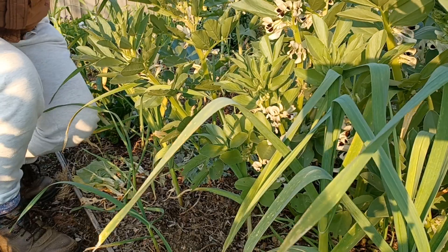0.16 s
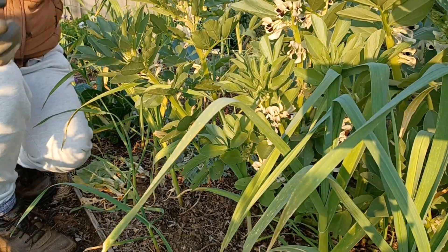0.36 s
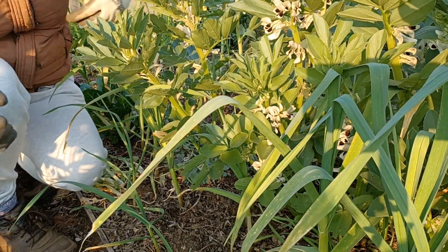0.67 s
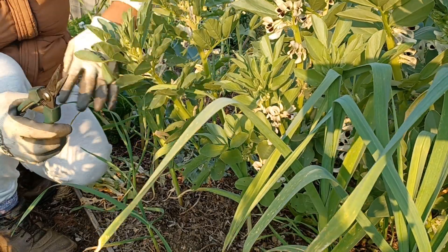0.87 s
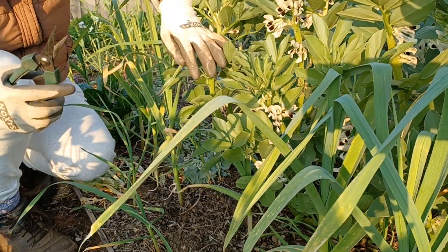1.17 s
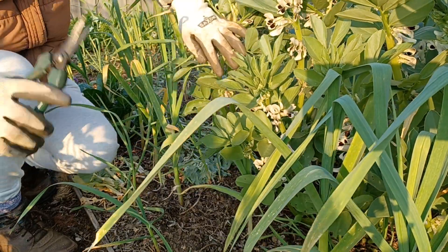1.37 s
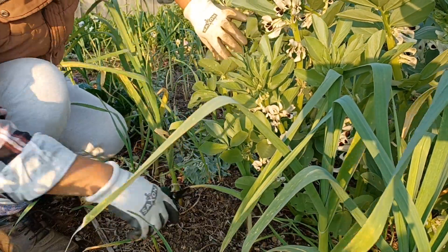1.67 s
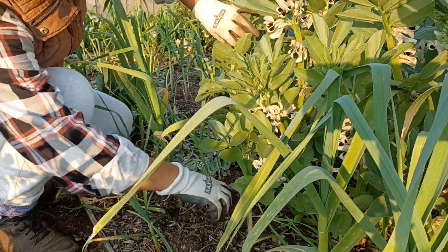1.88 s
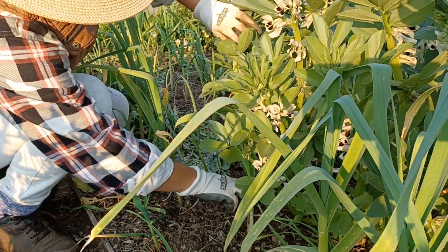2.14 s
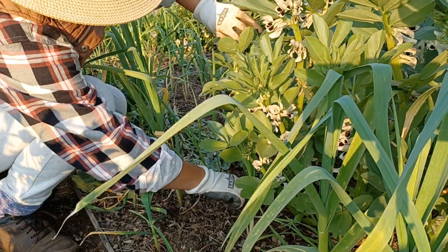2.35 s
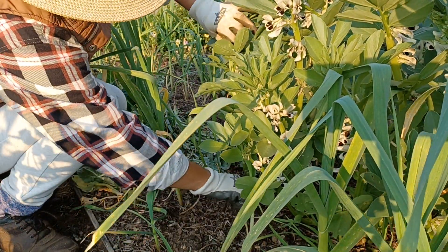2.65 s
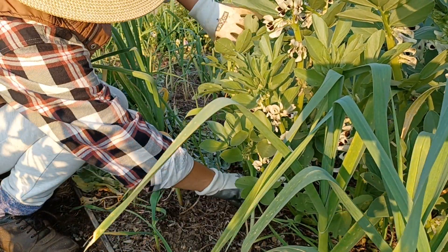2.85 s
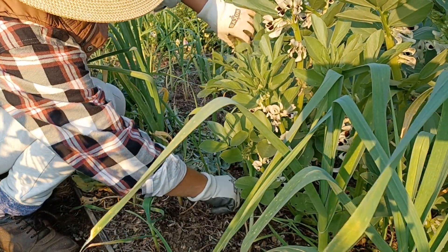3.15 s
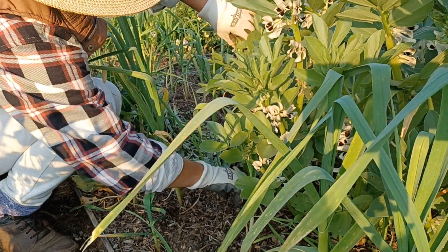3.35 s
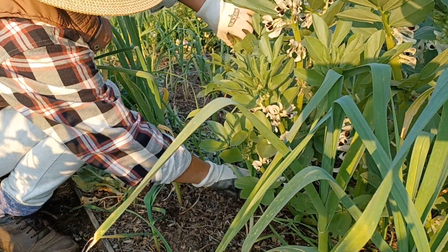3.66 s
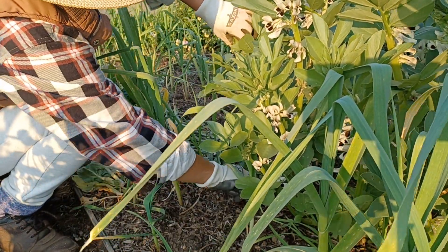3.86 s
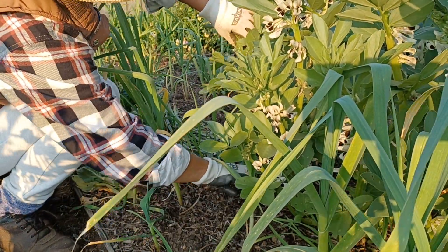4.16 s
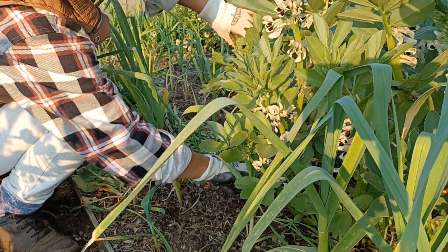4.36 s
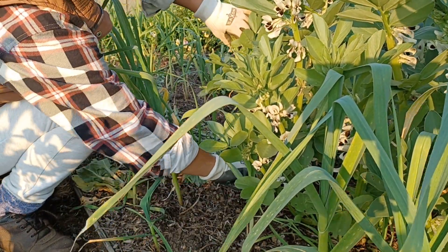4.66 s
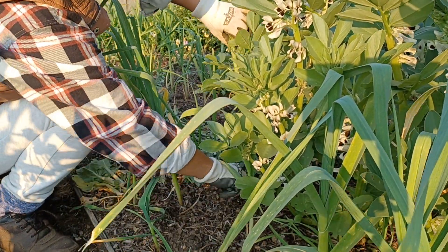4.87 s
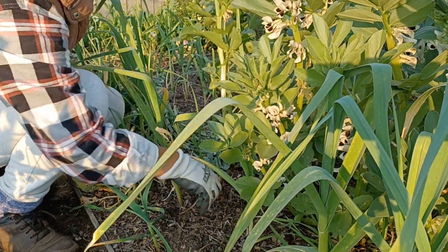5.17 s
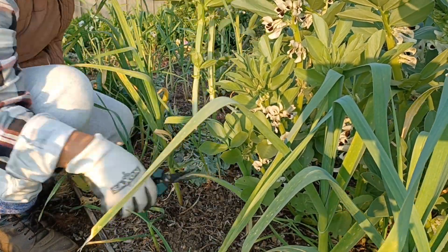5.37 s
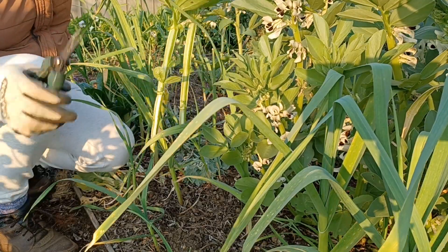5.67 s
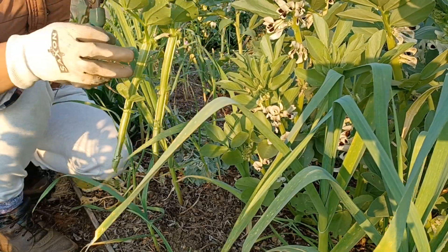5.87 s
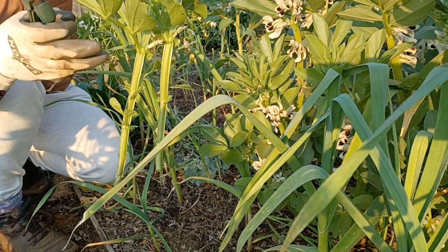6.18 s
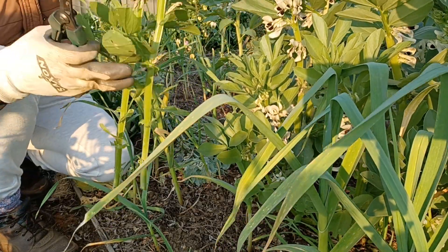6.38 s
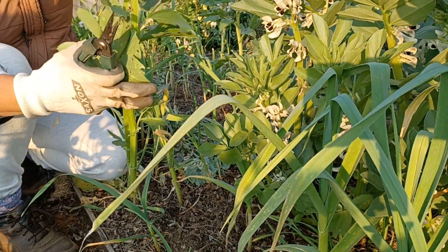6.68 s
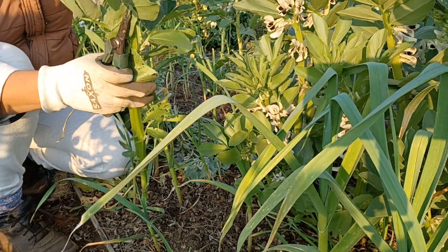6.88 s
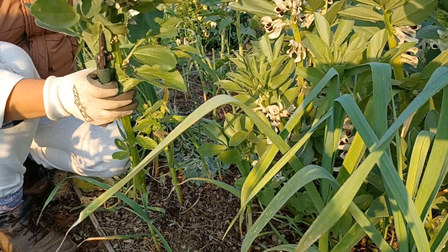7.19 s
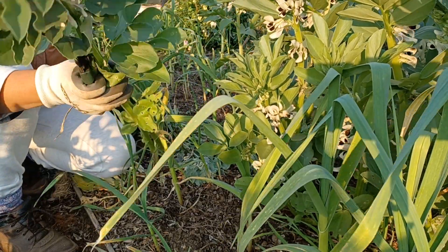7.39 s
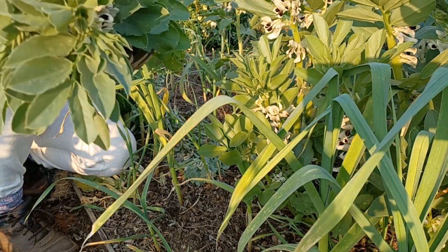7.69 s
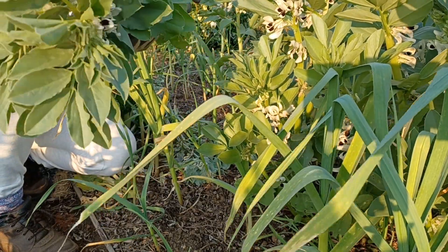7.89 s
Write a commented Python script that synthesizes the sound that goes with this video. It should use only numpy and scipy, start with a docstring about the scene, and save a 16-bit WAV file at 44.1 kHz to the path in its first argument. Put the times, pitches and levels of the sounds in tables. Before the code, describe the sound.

A very quiet garden with a faint low hum under everything, heard close up in stereo. From 0 to 0.3 s crisp leaves brush past with tiny dry ticks. Around 1 s a low puff of wind thumps the microphone, with lighter rustling until 2.7 s. Foliage rubbing swells just before 3 s, and at 3.04 s hand pruners bite with a sharp, close double click, a hollow stem knock and a brief metallic ring. From 3.5 to 4.7 s only faint leaf rubbing and small wind bumps remain. At 4.82 to 4.86 s fibres crackle, then a second hard snip lands at 4.91 s. From 5.6 s wind buffets repeatedly with dull, sinking low thumps, shifting left and right. Between 6.4 and 7.2 s cut plants drag through neighbours in the loudest leafy swish, then softer rustle, ticks and thumps fade towards 8 s.

```python
"""Snipping stems in a bean bed

A gardener brushes through the leaves, snips stems with hand pruners and draws the cut plants out.
Leaves are grainy noise shaped by swells; fibre ticks and snips are noise bursts, the snips with decaying rings.
A light breeze is lumpy low noise, and its eddies bump on the two microphone ports as short sinking tones.
Behind it all lies a very quiet garden: steady, mostly low noise with a faint drone."""
import sys
import numpy as np
from scipy import signal
from scipy.fft import rfft, irfft, next_fast_len
from scipy.io import wavfile
from scipy.ndimage import uniform_filter1d, map_coordinates

SR = 44100
rng = np.random.default_rng(int(sys.argv[2]) if len(sys.argv) > 2 else 0)


def master(y):
    """Save y as 16-bit WAV."""
    cut = np.clip(np.atleast_2d(y).T, -1, 1)
    pcm = np.round(cut * 32767)  # scale
    wavfile.write(sys.argv[1], SR, pcm.astype(np.int16))


N = 354563
T = np.arange(N) / SR  # time of every sample, in seconds


def amp(db):
    """Turn decibels into a plain gain."""
    return 10 ** (np.asarray(db) / 20)


def unit(x):
    """Scale a signal to an average (rms) level of 1."""
    return x / np.sqrt(np.mean(x ** 2) + 1e-20)


def along(points, hz):
    """Read a curve of (Hz, value) points, spacing pitch by ratio as the ear does."""
    point_hz, values = np.transpose(points)
    return np.interp(np.log(hz + 1), np.log(point_hz + 1), values)


def wobble(rate):
    """Draw a smooth random curve through `rate` random points a second."""
    knots = rng.standard_normal(int(N * rate / SR) + 4)
    return map_coordinates(knots, [T * rate])


def filtered(x, response):
    """Multiply each frequency of a sound by a response."""
    n = x.shape[-1]
    padded = next_fast_len(n + 8192)
    spectrum = rfft(x, padded) * response(np.fft.rfftfreq(padded, 1 / SR))
    return irfft(spectrum, padded)[..., :n]


def coloured(x, spectrum):
    """Give a sound a tone colour, then set its rms to 1."""
    return unit(filtered(x, lambda hz: amp(along(spectrum, hz))))


def stereo(pair, spectrum, alike):
    """Blend two unrelated signals into a coloured left and right that are partly alike."""
    def mid_side_gains(hz):
        turn = np.arccos(np.clip(along(alike, hz), -1, 1)) / 2
        return np.array([np.cos(turn), np.sin(turn)])

    mid, side = filtered(pair, mid_side_gains)
    return coloured(np.array([mid + side, mid - side]), spectrum)


def panned(pan_db):
    """Left and right gains that average 1; positive values are louder on the left."""
    left = 2 / (1 + amp(-np.atleast_1d(pan_db)))
    return np.array([left, 2 - left])


def add(track, s, sound):
    """Mix a sound into the track, starting at s seconds."""
    part = track[:, round(s * SR):][:, :sound.shape[-1]]
    part += sound[..., :part.shape[-1]]


def swells(rows, attack_s, fall_db_per_s):
    """Each row rises smoothly around its start, holds and dies away; overlaps add in power."""
    power = 0
    for start_s, hold_s, *levels_db in rows:
        rise = (1 + np.tanh((T - start_s) / attack_s)) / 2
        fall = amp(-fall_db_per_s * np.maximum(T - start_s - hold_s, 0))
        # one gain curve for each level column
        power = power + np.outer(amp(levels_db), rise * fall) ** 2
    return np.sqrt(power)


def knock(t, hz, life):
    """A heavily damped tone whose strength crests after `life` seconds."""
    return np.sin(2 * np.pi * hz * t) * t / life * np.exp(1 - t / life)


def garden():
    """The still garden is steady, mostly low noise with a faint drone in its tone colour."""
    # tone colour of the background: pitch_hz [Hz], relative level_db [dB]
    garden_colour = [(25, -13), (65, -7), (150, 7), (190, -8), (218, 10), (250, 0), (480, -8), (850, -6.5),
                     (1500, -12.5), (3100, -22), (6200, -15), (8500, -20), (15500, -29)]
    noise = rng.standard_normal((2, N))
    return amp(-69.5) * stereo(noise, garden_colour, [(300, 0.4), (3000, 0.06)])


def friction(rate, spread_db, smooth):
    """Rubbing makes tiny slips of uneven size, `rate` a second, over a smooth hiss."""
    sizes = amp(spread_db * np.clip(rng.standard_normal(N), -2, 2))
    slips = (rng.random(N) < rate / SR) * sizes
    return unit(slips * rng.standard_normal((2, N))) + smooth * rng.standard_normal((2, N))


def patchy(pair, depth_db):
    """Uneven leaf colours become random patches of loudness over time and pitch."""
    z = signal.stft(pair, nperseg=256)[2]
    field = rng.standard_normal(z.shape[1:])
    field = uniform_filter1d(field, size=5, axis=0)  # smooth over pitch
    field = uniform_filter1d(field, size=12, axis=1)  # smooth over time
    return signal.istft(z * amp(depth_db * unit(field)), nperseg=256)[1][:, :N]


def rustle(gains, spectrum, alike, rub_db, leaf_db, flutter_db, crackle_db):
    """Soft surfaces rub in a grainy band with sparse crackles; leaf edges add a broad crisp hiss."""
    # tone colour of crisp leaf edges: pitch_hz [Hz], relative level_db [dB]
    leaf_colour = [(150, -8), (500, -12.5), (1000, -7.5), (1700, -8.5), (2800, -8.5), (5000, -1.5),
                   (7000, -3), (8800, -4), (12300, 1.5), (14500, 0), (16000, -3.5)]
    crackle_colour = [(800, -21.5), (4000, -10.0), (7000, 3.5), (9000, -8.0), (15000, 1.0)]
    rub_gain, leaf_gain = gains
    flutter = amp(flutter_db * (wobble(28) + wobble(110)))

    rub_grains = friction(rate=1300, spread_db=-0.5, smooth=1.0)
    rub = stereo(patchy(rub_grains, depth_db=2.5), spectrum, alike)
    leaf_grains = friction(rate=2700, spread_db=0.5, smooth=0.88)
    leaf = stereo(patchy(leaf_grains, depth_db=2.5), leaf_colour, alike)
    crackle_grains = friction(rate=65, spread_db=-1.5, smooth=0)
    crackle = amp(crackle_db) * stereo(crackle_grains, crackle_colour, alike)

    soft = amp(rub_db) * rub_gain * (rub + crackle)
    crisp = amp(leaf_db) * leaf_gain * leaf
    return flutter * (soft + crisp)


def foliage():
    """The arm brushes leaves on its way in, then cut plants are tugged through their neighbours."""
    # arm brushes, then plant tugs: start_s [s], hold_s [s], relative rub_db [dB], relative leaf_db [dB]
    reach_rows = [(-0.05, 0.056, -64.5, -62), (0.145, 0.052, -63.5, -58.5), (0.88, 0.059, -70, -71.5),
                  (0.95, 0.1, -68, -65), (1.23, 0.29, -72, -71.5), (1.4, 0.29, -66.5, -72),
                  (1.82, 0.21, -68.5, -71.5), (2.08, 0.16, -73.5, -77.5), (2.27, 0.034, -72.5, -68),
                  (2.42, 0.021, -70.5, -62.5), (2.64, 0.06, -69.5, -65), (2.68, 0.25, -67.5, -73.5),
                  (2.86, 0.15, -63.5, -69), (3.05, 0.098, -60.5, -60.5), (3.5, 0.016, -70, -71),
                  (3.72, 0.055, -70, -77.5), (3.87, 0.084, -81.5, -86.5), (4.1, 0.14, -74, -81),
                  (4.41, 0.061, -75.5, -79), (4.61, 0.11, -74.5, -79), (4.84, 0.046, -65.5, -73.5),
                  (5.05, 0.26, -74, -81.5)]
    drag_rows = [(5.48, 0.18, -83.5, -87.5), (5.66, 0.28, -73.5, -76.5), (6.03, 0.082, -70, -85),
                 (6.19, 0.072, -75.5, -80.5), (6.39, 0.31, -65, -64), (6.7, 0.48, -59, -57.5),
                 (6.79, 0.17, -56.5, -59), (7.27, 0.096, -72.5, -70.5), (7.46, 0.038, -77, -67),
                 (7.59, 0.38, -74.5, -75.5)]
    # tone colours of brushing and tugging: pitch_hz [Hz], relative level_db [dB]
    rub_colour = [(300, -21.5), (1200, -12.5), (2000, -4), (3000, -5), (4200, -0.5), (7000, 1), (8200, -16),
                  (16000, -27)]
    swish_colour = [(300, -3), (900, -8.5), (1500, -3), (3000, -5), (4800, -1), (6200, -2.5), (7100, 1),
                    (8300, -12.5), (16000, -30.5)]
    # left-right likeness of brushing and tugging: pitch_hz [Hz], likeness [-1 to 1, no unit]
    reach_alike = [(300, 0.24), (1000, 0), (3100, 0.45), (7000, 0.14), (14000, 0)]
    drag_alike = [(300, 0.45), (1400, 0.12), (3100, -0.36), (6800, 0.29), (14000, 0.14)]
    # a brush swells quickly and settles after it; a tug builds more slowly and ends sooner
    brushes = swells(reach_rows, attack_s=0.033, fall_db_per_s=91.5)
    tugs = swells(drag_rows, attack_s=0.069, fall_db_per_s=146)
    reach = rustle(brushes, rub_colour, reach_alike,
                   rub_db=2.5, leaf_db=5.5, flutter_db=1.27, crackle_db=-19.5)
    drag = rustle(tugs, swish_colour, drag_alike,
                  rub_db=4.0, leaf_db=6.5, flutter_db=1.5, crackle_db=-9)
    return reach + drag


def ticks(t60_s=0.0065, tail_db=-16, tail_t60_s=0.043, crack_gain_db=-5, high_gain_db=3):
    """A fibre parts or a stalk slips off a leaf with a tiny dry tick of noise."""
    # cracks and flicks: start_s [s, before a short delay], relative crack_db [dB], relative high_db [dB]
    tick_rows = [(0.0729, -54.5, -64), (0.188, -42, -58.5), (0.378, -51.5, -71), (0.6117, -76, -66.5),
                 (0.906, -62, -64), (1.9433, -48.5, -67), (2.229, -69, -74), (3.0052, -45.5, -52),
                 (3.0116, -41, -54), (4.8238, -47, -55), (4.8325, -31.5, -61.5), (4.8454, -41, -53),
                 (4.852, -39, -47), (4.858, -27, -64), (5.1871, -76, -56), (5.4544, -53, -73),
                 (6.2593, -66, -60.5), (6.549, -52, -53.5), (7.297, -61, -56), (7.4305, -52.5, -59),
                 (7.444, -61, -50), (8.0038, -64, -55)]
    # tone colours of the crack and the high tick: pitch_hz [Hz], relative level_db [dB]
    fibre_colour = [(400, -22.5), (900, 2), (1600, -11.5), (3800, -3), (6500, -5), (9000, -18),
                    (15000, -13)]
    spark_colour = [(3000, -26.5), (7000, 5.5), (11000, 4), (15500, -4.5)]
    out, t = np.zeros((2, N)), T[:SR // 16]
    # t60 is the time to fade by 60 dB
    fade = amp(-60 * t / t60_s) + amp(tail_db - 60 * t / tail_t60_s)
    for start_s, crack_db, high_db in tick_rows:
        crack = stereo(rng.standard_normal((2, len(t))), fibre_colour, [(1500, 0.83), (12000, 0.16)])
        high = coloured(rng.standard_normal((2, len(t))), spark_colour)
        tick = amp(crack_db + crack_gain_db) * crack + amp(high_db + high_gain_db) * high
        add(out, start_s + 0.00088, fade * tick)
    return out


def breeze(level_db=2.0, lump_db=2.5):
    """Puffs of lumpy low turbulence rise over nearly calm air, different at each port."""
    # puffs: start_s [s, middle of the rise], hold_s [s], relative left_db [dB], relative right_db [dB]
    gust_rows = [(0.35, 0.037, -59.5, -61.5), (0.52, 0.037, -61, -67), (0.94, 0.04, -46.5, -68),
                 (1.0, 0.11, -39, -39), (1.24, 0.13, -48, -48), (1.42, 0.016, -50, -42),
                 (1.51, 0.068, -45.5, -45), (1.95, 0.39, -91, -92), (3.06, 0.25, -52, -44.5),
                 (3.44, 0.22, -67, -45.5), (3.71, 0.34, -48.5, -45.5), (4.35, 0.017, -54.5, -60),
                 (4.57, 0.025, -45.5, -56), (4.68, 0.11, -52.5, -50), (4.86, 0.19, -52, -52),
                 (5.17, 0.14, -51, -46.5), (5.48, 0.077, -48, -52), (5.67, 0.15, -35.5, -37),
                 (5.92, 0.11, -49.5, -37.5), (6.07, 0.29, -42, -40.5), (6.44, 0.21, -38.5, -36.5),
                 (6.72, 0.35, -34.5, -34), (7.12, 0.14, -43.5, -35.5), (7.33, 0.49, -48.5, -51),
                 (7.59, 0.32, -42.5, -35)]
    # tone colour of the turbulence: pitch_hz [Hz], relative level_db [dB]
    buffet_colour = [(20, -33), (40, -13.5), (62, -1), (100, 3), (150, -2.5), (190, -19), (222, -9.5),
                     (270, -22.5), (300, -21), (400, -31.5), (550, -37), (900, -42), (2000, -84.5)]
    lumps = amp(lump_db * np.array([wobble(30), wobble(30)]))
    flow = stereo(rng.standard_normal((2, N)), buffet_colour, [(100, 0.24)])
    puffs = swells(gust_rows, attack_s=0.018, fall_db_per_s=163)
    strength = np.hypot(puffs, amp(-76.5))  # calm air keeps a faint floor
    return amp(level_db) * strength * unit(lumps * flow)


def bumps(crest_s=0.01332, spread=0.46, droop=0.4522, overtone_db=-17, level_db=1,
          pop_hz=310, pop_delay_s=0.00474, pop_gain_db=8):
    """An eddy strikes a port: a soft pop, and a few low cycles that swell and sink in pitch."""
    # eddies: start_s [s], relative bump_db [dB], pitch_hz at the crest [Hz],
    # left_minus_right_db [dB], relative pop_db [dB]
    bump_rows = [(1.07, -27.5, 114.3, 10, -63), (1.139, -35, 96, -5, -57), (2.869, -42, 97.4, 6, -68),
                 (3.032, -27.5, 106.9, -33, -43), (3.688, -27.5, 120, -40, -54),
                 (3.879, -35, 128, -25, -65), (4.072, -36, 107, -26, -62.5), (4.897, -35, 116, -20, -47),
                 (5.153, -35, 117.4, -19, -68), (5.622, -25, 143, 27, -59), (5.715, -23.5, 126, -20, -52),
                 (5.754, -26.5, 118.7, 24, -61), (5.805, -31.5, 133, -20, -72),
                 (5.881, -21, 126.5, -24, -53), (6.193, -30.5, 130.6, -38, -66),
                 (6.273, -29.5, 122, 21, -64), (6.307, -30, 127.4, 37, -56), (6.432, -28, 141, -23, -63),
                 (6.566, -34.5, 124.6, 17, -78), (6.611, -26.5, 111, -30, -67),
                 (6.733, -26.5, 102.5, 10, -66), (6.821, -28.5, 117.3, 13, -58),
                 (6.878, -22.5, 155.5, -40, -55), (6.941, -26, 109, -6, -59), (7.002, -25, 110, -28, -70),
                 (7.154, -24, 129, -37, -41), (7.319, -31.5, 115.6, 7, -62),
                 (7.499, -20.5, 120.7, -52, -43), (7.585, -24, 158.4, -24, -38),
                 (7.682, -25, 122, -30, -46.5), (7.755, -34.5, 108, 25, -69),
                 (7.859, -29.5, 114.2, -27, -68), (7.89, -33, 97.3, -32, -49)]
    out, t = np.zeros((2, N)), T[1:SR // 10]
    age = np.log(t / crest_s)  # zero at the crest
    since_pop = (t - pop_delay_s) / 0.002
    pop = np.sin(2 * np.pi * pop_hz * (t - pop_delay_s)) * np.exp(-(since_pop - 1) ** 2)
    for start_s, bump_db, pitch_hz, pan_db, pop_db in bump_rows:
        sinking_hz = pitch_hz * np.exp(-droop * age)
        phase = 2 * np.pi * (np.cumsum(sinking_hz) / SR + rng.random())
        tone = np.sin(phase) + amp(overtone_db) * np.sin(2 * phase)
        swell = tone * np.exp(-(age / spread) ** 2 / 2)
        bump = amp(bump_db + level_db) * swell + amp(pop_db + pop_gain_db) * pop
        add(out, start_s, panned(pan_db) * bump)
    return out


def housing(x, ring_hz=238, width_hz=55, ring_db=3):
    """The microphone body hums briefly after every push, as one added resonance."""
    def response(hz):
        damping = 1j * hz * width_hz
        return 1 + amp(ring_db) * damping / (ring_hz ** 2 - hz ** 2 + damping)

    return filtered(x, response)


def pruner_ring(after, resonances):
    """Struck blades ring as fading sine waves, with slightly random strengths and phases."""
    ring = 0
    for hz, width_hz, level_db in resonances:
        strength = amp(level_db + rng.normal(0, 2.9))
        fade = np.exp(-np.pi * abs(width_hz) * after)
        phase = rng.uniform(0, 0.91, (2, 1))
        ring = ring + strength * fade * np.sin(2 * np.pi * hz * after + phase)
    return ring


def snips(snap_delay_s=0.0015, scrape_db=-14, snap_t60_s=0.0073, rattle_db=-15, rattle_t60_s=0.052,
          scatter_db=-35, scatter_t60_s=0.53, ring_db=-5):
    """The stem gives with a scrape and hollow knock; then the blades snap home and ring briefly."""
    # cuts: start_s [s], relative snap_db [dB], relative knock_db [dB], knock_hz [Hz],
    # relative thud_db [dB], ring_hz [Hz]
    snip_rows = [(3.0354, -17, -44, 1060, -31.5, 4670), (3.0403, -10, -24, 1145, -24.5, 4630),
                 (4.91, -8, -21, 928, -36, 6300)]
    # high resonances of the pruners: pitch_hz [Hz], width_hz [Hz], relative level_db [dB]
    pruner_modes = [(2800, 280, -17.5), (6730, 180, -9.5), (10080, 120, -11.5), (10700, 450, -4.5),
                    (11300, 320, -8.5), (15000, 180, -4)]
    # tone colour of scrape and snap: pitch_hz [Hz], relative level_db [dB]
    crack_colour = [(300, -2.5), (900, 3.5), (1750, -5.5), (2300, -0.5), (3800, 1), (6000, 2.5),
                    (8500, -5.5), (11000, 1), (16000, -3.5)]
    out, t = np.zeros((2, N)), T[:SR // 2]
    after = np.maximum(t - snap_delay_s, 0)  # time since the snap
    # the snap itself, the rattling joint, then what plants and ground throw back
    fade = amp(-60 * after / snap_t60_s)
    fade = fade + amp(rattle_db - 60 * after / rattle_t60_s)
    fade = fade + amp(scatter_db - 60 * after / scatter_t60_s)
    for start_s, snap_db, knock_db, knock_hz, thud_db, ring_hz in snip_rows:
        hollow = knock(t, knock_hz, life=0.00081)
        hollow = hollow - 1.67 * knock(after, 2.38 * knock_hz, life=0.00023)
        thud = panned(-13) * knock(t, 239, life=0.0011)
        stem = amp(knock_db) * hollow + amp(thud_db) * thud

        noise = rng.standard_normal((2, len(t)))
        noise = stereo(noise, crack_colour, [(1500, 0.35), (5000, 0.22), (12000, 0.08)])
        scrape = amp(scrape_db) * noise * (t < snap_delay_s)
        ring = pruner_ring(after, [(ring_hz, 420, 3), *pruner_modes])
        onset = 1 - np.exp(-after / 0.00042)
        snap = (noise * fade + amp(ring_db) * ring) * onset
        add(out, start_s, stem + amp(snap_db - 8) * (scrape + snap))
    return out


def scene():
    """Mix the still garden, foliage, ticks, breeze, bumps and pruners."""
    return garden() + foliage() + ticks() + breeze() + housing(bumps()) + snips()


def record(dry, low_cut_hz=44, top_hz=16050):
    """The microphone sheds the deepest bass and keeps nothing above its top pitch."""
    return filtered(dry, lambda hz: (hz < top_hz) / np.sqrt(1 + (low_cut_hz / (hz + 1)) ** 6))


dry = scene()
out = record(dry)
master(out)
```